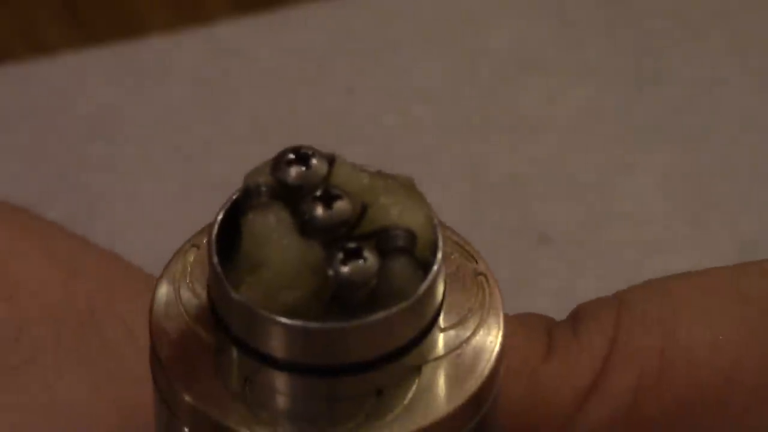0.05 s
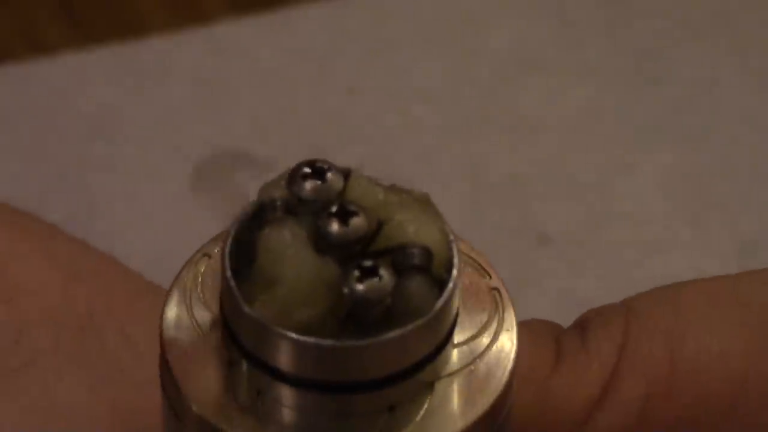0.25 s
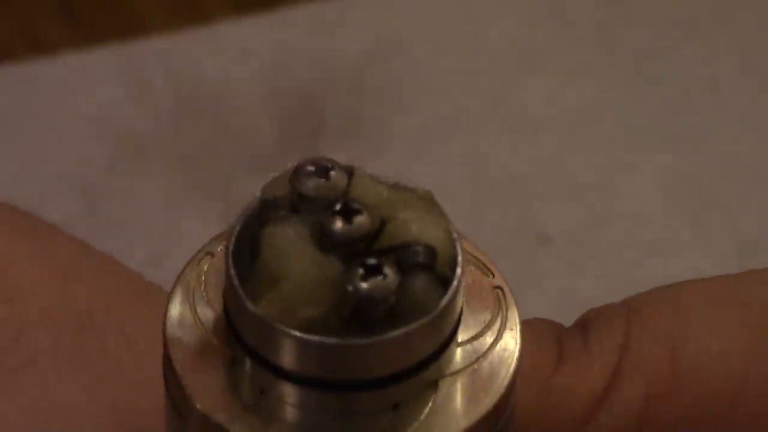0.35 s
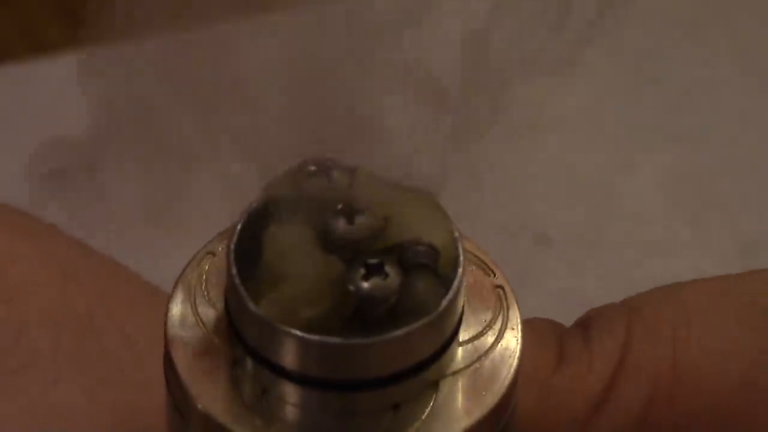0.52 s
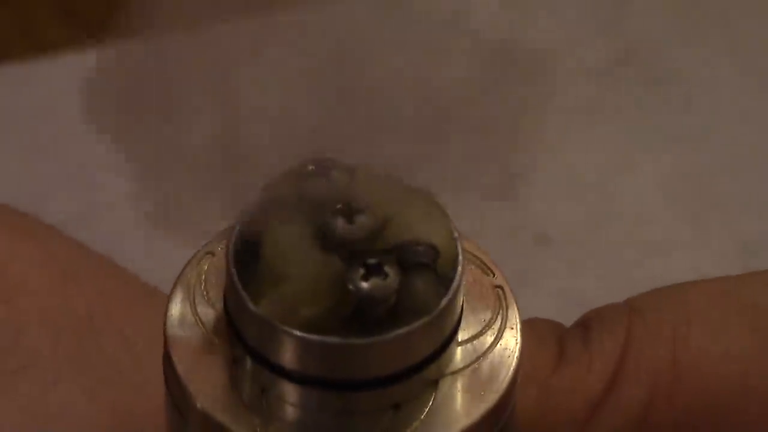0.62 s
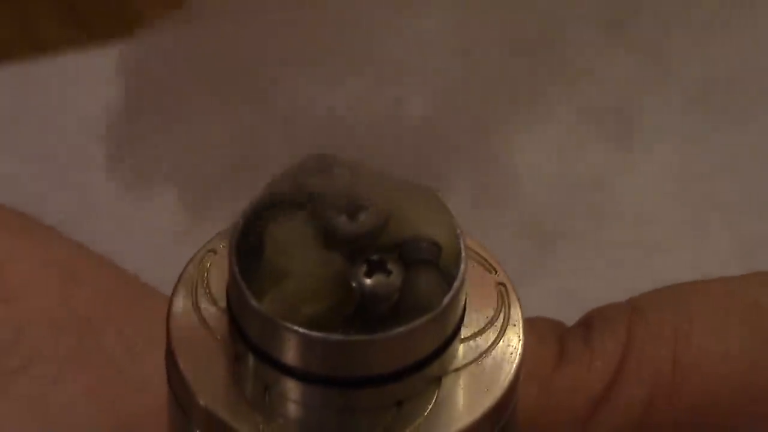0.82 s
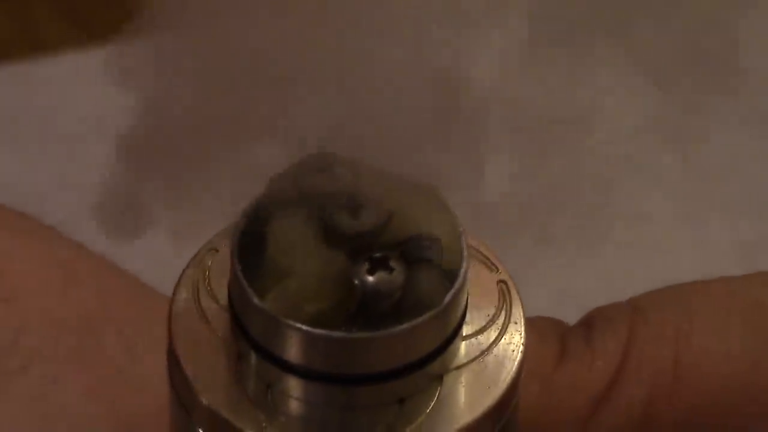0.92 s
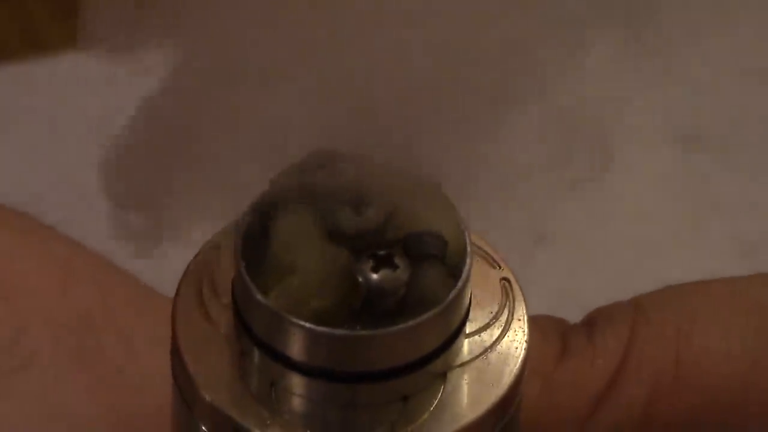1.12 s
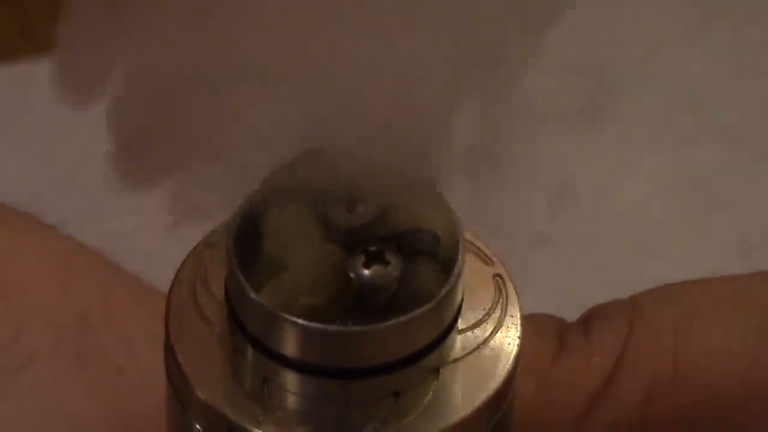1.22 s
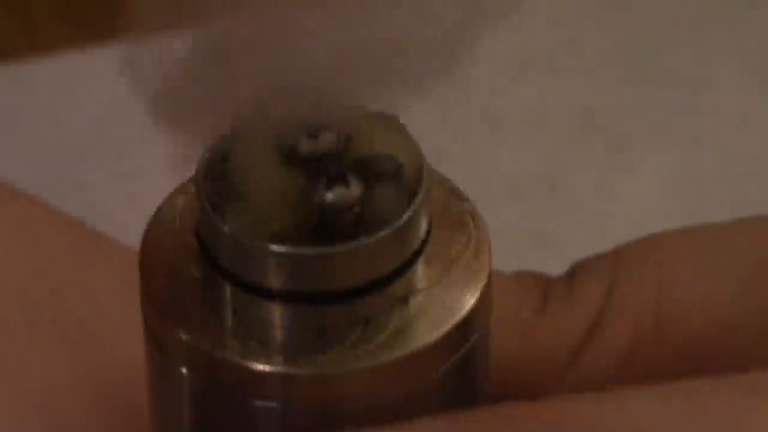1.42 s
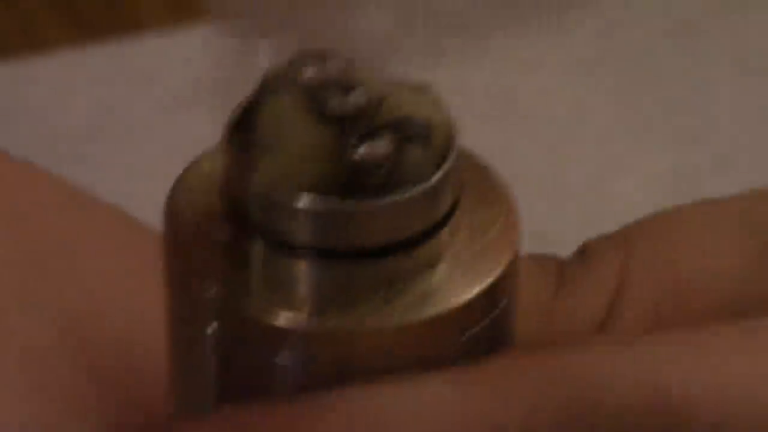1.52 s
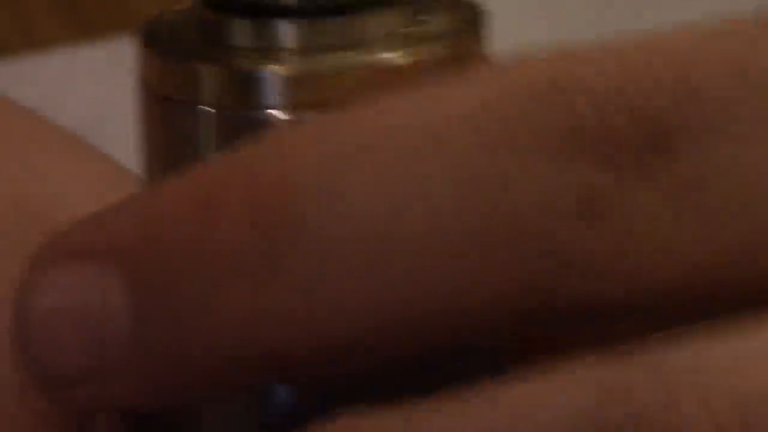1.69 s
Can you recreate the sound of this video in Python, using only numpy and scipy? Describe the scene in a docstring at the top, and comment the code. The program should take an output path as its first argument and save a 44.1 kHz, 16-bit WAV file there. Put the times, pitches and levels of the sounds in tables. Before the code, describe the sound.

A wet heating coil sizzles and crackles with sharp little pops, then dies away.

```python
"""Faint ticks of fingers on a device are heard first, in a quiet room; then its wet heating coil fires.
A fine fizz starts at once, coarser boiling builds as the wick heats, and droplets burst with sharp pops
that overload the recorder. Each burst is a pressure impulse, coloured by the metal deck and by surfaces
close to it. The sizzle dies away, and its colour slides down, as the hand shifts the device."""
import sys
import numpy as np
from scipy import signal
from scipy.fft import rfft, irfft
from scipy.io import wavfile
from scipy.ndimage import uniform_filter1d

SR = 44100
rng = np.random.default_rng(int(sys.argv[2]) if len(sys.argv) > 2 else 0)


def master(y):
    """Save y as 16-bit WAV."""
    cut = np.clip(np.atleast_2d(y).T, -1, 1)
    pcm = np.round(cut * 32767)  # scale
    wavfile.write(sys.argv[1], SR, pcm.astype(np.int16))


N = 77175
T = np.arange(N) / SR
FREQS = np.maximum(np.arange(2049) * SR / 4096, 1)

# spectrum of the room's background noise: f/Hz, relative level/dB
ROOM_TONE_SPECTRUM = [(25, -13), (100, -9.5), (150, 1), (290, 0), (450, -5), (700, -5), (1100, -9.5),
                      (1500, -9), (2000, -14.5), (2300, -10), (2800, -18.5), (6000, -22.5), (9000, -34.5),
                      (16000, -36)]
# frequency response of the reverberation: f/Hz, gain/dB
REVERB_RESPONSE = [(100, 1.5), (400, 4), (1500, -0.5), (5000, -4), (10000, -16), (16000, -8)]
# finger ticks before the coil fires: t/s, level/dB, f/Hz
FINGER_TICKS = [(.078, -50, 2400), (.082, -61, 8400), (.099, -62, 8000), (.158, -48.5, 6470),
                (0.17, -54, 6000)]
# notches cut by the deck and nearby surfaces: f/Hz, width/Hz, gain/dB
DECK_NOTCHES = [(430, 67, -4), (873, 70, -7), (2190, 206, -7.5), (2570, 140, -5.5), (3955, 230, -2.5),
                (4890, 79, -8.5), (5550, 240, -3.5), (5960, 90, -9), (7130, 140, -9), (8150, 90, -3),
                (10900, 250, -2.5), (12450, 280, -3)]
# envelopes of the fine fizz and the coarser boiling: t/s, level/dB
FIZZ_ENVELOPE = [(.187, -74), (.199, -45), (.222, -39), (.235, -33.5), (.314, -35), (.342, -31),
                 (.415, -32.7), (.46, -31), (.56, -28.5), (.72, -31), (.80, -28.5), (.95, -29.5),
                 (1.12, -30.5), (1.26, -28.3), (1.41, -30.5), (1.47, -39), (1.51, -35.5), (1.53, -47.5),
                 (1.75, -55)]
BOIL_ENVELOPE = [(.18, -76), (.215, -48.7), (.32, -46.3), (.38, -40.5), (.46, -33.5), (.55, -33),
                 (.66, -36.5), (.80, -33.5), (.93, -36.5), (1.08, -35.5), (1.27, -35), (1.39, -40),
                 (1.55, -46.5), (1.75, -53.5)]
# their source spectra: f/Hz, relative level/dB
FIZZ_SPECTRUM = [(2000, -44), (2800, -16), (5500, -18), (7000, -10), (8700, -2.5), (9600, -2), (10150, 1.5),
                 (10700, -1), (11900, -3.5), (13350, -8.5), (13750, -19.5), (16000, -24)]
BOIL_SPECTRUM = [(80, -23.5), (250, -5.5), (650, -3.7), (1200, -.5), (1800, -.7), (2400, 2), (2900, 2.5),
                 (3600, 1.5), (5000, -1.5), (6500, 0), (7300, 0), (8900, 0), (11000, -9), (14000, -20),
                 (16000, -21)]
# spectrum of one bursting droplet: f/Hz, relative level/dB
BURST_SPECTRUM = [(40, -33), (110, -21), (230, -6), (650, -5), (1400, 1), (3200, 4.5), (5500, 1), (8000, 4),
                  (10200, 6), (12000, -0.5), (13300, -10), (14200, -20), (16000, -19.5)]
# droplets bursting on the coil: t/s, gain/dB, ring f/Hz, ring boost/dB, tilt/(dB/octave), treble loss/dB
DROPLETS = [(.3918, -8.5, 2900, 3, -3, 4), (.4048, 8.5, 2500, 4, -1.7, 9), (.4470, 7, 3400, 2.5, -.8, 0),
            (0.4681, -5, 3800, 1, 0.5, 0), (.4864, 1, 2800, 4, -3, 1), (.4878, 3, 7900, 4.5, -0.2, 6),
            (.5154, 9, 2650, 5.5, -3, 6), (.5377, 5.5, 9500, 0.5, 2, 0), (.7394, -3.5, 3980, 3, -1, 2),
            (.7677, 8.5, 7700, 9.5, -.5, 11), (.8837, 3.5, 10100, 5, 1, 0), (.9928, -2, 9000, 5, -1, 1),
            (1.0704, -1, 9500, 3.5, .3, 0), (1.1308, 3, 3580, 2.5, 0, 0), (1.2637, -1, 9000, 1, -.5, 2)]


def undb(db):
    """Amplitude ratio of a level in decibels."""
    return 10 ** (np.asarray(db) / 20)


def unit(x):
    """Normalisation to rms 1."""
    return x / np.sqrt(np.mean(x ** 2))


def colour(points):
    """Gain in dB, interpolated over logarithmic frequency."""
    hz, db = np.array(points).T
    return np.interp(np.log(FREQS), np.log(hz), db)


def resonance(hz, octaves):
    """Resonance curve of height 1 and the given half-width."""
    return 1 / (1 + (np.log2(FREQS / hz) / octaves) ** 2)


def response(db):
    """Minimum-phase impulse response: folding the cepstrum makes it causal."""
    cepstrum = irfft(np.log(undb(db)))
    half = len(cepstrum) // 2
    cepstrum[1:half] *= 2
    cepstrum[half + 1:] = 0
    return irfft(np.exp(rfft(cepstrum)))[:half]


def through(x, ir):
    """Linear filtering by convolution."""
    return signal.fftconvolve(x, ir)[:N]


def noise(db):
    """Spectral shaping of white noise, at rms 1."""
    return unit(through(rng.standard_normal(N), response(db)))


def add(out, start, x):
    """Superposition of a short sound at a start time in seconds."""
    i = int(start * SR)
    out[i:i + len(x)] += x[:N - i]


def wander(hz):
    """Random modulation of rms 1: steps smoothed by a moving average."""
    hold = max(int(SR / hz), 1)
    steps = rng.standard_normal(N)[np.arange(N) // hold]
    return unit(uniform_filter1d(steps, hold))


def stereo(mid, side, width):
    """Sum and difference of mid and side give left and right."""
    return np.array([mid + width * side, mid - width * side])


def room_tone(level_db=-55.5):
    """Stationary background noise, partly correlated between the channels."""
    mid, side = (noise(colour(ROOM_TONE_SPECTRUM)) for _ in range(2))
    return undb(level_db) * stereo(mid, side, width=.3)


def reverberation(x, gain_db=-14, t60_s=.17, delay_s=.008):
    """Diffuse reflections from the walls form a faint, dull tail that decays exponentially."""
    decay = (T > delay_s) * np.exp(-np.log(1000) * T / t60_s)
    dull = through(x, response(colour(REVERB_RESPONSE)))
    tails = [unit(rng.standard_normal(N) * decay) / np.sqrt(N) for _ in range(2)]
    mid, side = (through(dull, tail) for tail in tails)
    return undb(gain_db) * stereo(mid, side, width=.2)


def finger_ticks(decay_s=.0037):
    """Friction of fingers on the device gives quickly damped bursts of band-limited noise."""
    out = np.zeros(N)
    for start, db, hz in FINGER_TICKS:
        scuff = noise(20 * np.log10(resonance(hz, octaves=.35) ** 2))
        add(out, start, undb(db) * scuff * np.exp(-T / decay_s))
    return out


def deck(echo_s=.0017, echo_db=-18):
    """Path gain in dB: narrow notches, and comb interference with the nearest surface's reflection."""
    notches = sum(db * np.exp(-((FREQS - hz) / width) ** 2) for hz, width, db in DECK_NOTCHES)
    reflection = undb(echo_db) * np.exp(-2j * np.pi * FREQS * echo_s)
    return notches + 20 * np.log10(abs(1 + reflection))


def bubbles(envelope, spectrum, per_s, spread_db, flutter_db):
    """Shot noise: tiny bursts of uneven size merge into a sizzle that comes in quick spurts."""
    clicks = (rng.random(N) < per_s / SR) * undb(spread_db * rng.standard_normal(N))
    clicks -= clicks.mean()
    still_db = colour(spectrum) + deck()
    moved_db = np.interp(FREQS / .95, FREQS, still_db)  # 5 % lower once the hand shifts the device
    still, moved = (unit(through(clicks, response(db))) for db in (still_db, moved_db))
    shift = np.interp(T, [1.38, 1.55], [0, 1])
    swarm = (1 - shift) * still + shift * moved
    level_db = np.interp(T, *np.array(envelope).T) + flutter_db * wander(hz=90)
    return swarm * undb(level_db)


def droplet_pops(dull_ratio=1.36, steepness=14):
    """Impulse excitation: each droplet is a pressure spike with a very short ring; big ones are duller."""
    out = np.zeros(N)
    burst_db = colour(BURST_SPECTRUM) + deck()
    octave = np.log2(np.maximum(FREQS, 1000) / 4000)  # the tilt pivots at 4 kHz, flat below 1 kHz
    for start, db, hz, ring_db, tilt, loss_db in DROPLETS:
        ring = resonance(hz, octaves=.33)
        treble = 1 / (1 + (dull_ratio * hz / FREQS) ** steepness)
        pop_db = burst_db + db + ring_db * ring + tilt * octave - loss_db * treble
        add(out, start, -response(pop_db))
    return out


def scene():
    """Superposition of direct sound from straight ahead, its reverberation and the background."""
    fizz = bubbles(FIZZ_ENVELOPE, FIZZ_SPECTRUM, per_s=10000, spread_db=3.6, flutter_db=1.0)
    boil = bubbles(BOIL_ENVELOPE, BOIL_SPECTRUM, per_s=4500, spread_db=4.7, flutter_db=.9)
    direct = fizz + boil + droplet_pops() + finger_ticks()
    return direct + reverberation(direct) + room_tone()


def record(dry, clip_level=.98, thump_db=-8, thump_hz=90, top_hz=15700):
    """Saturation clips the loudest pops, the input thumps as its bias recovers, and the top is cut."""
    clipped = np.clip(dry, -clip_level, clip_level)
    overload = np.minimum(abs(dry - clipped), clip_level)
    recovery = signal.butter(2, thump_hz, fs=SR, output="sos")
    thump = undb(thump_db) * signal.sosfilt(recovery, overload)
    lowpass = signal.ellip(8, .2, 70, top_hz, fs=SR, output="sos")
    return signal.sosfilt(lowpass, clipped + thump)


dry = scene()
out = record(dry)
master(out)
```